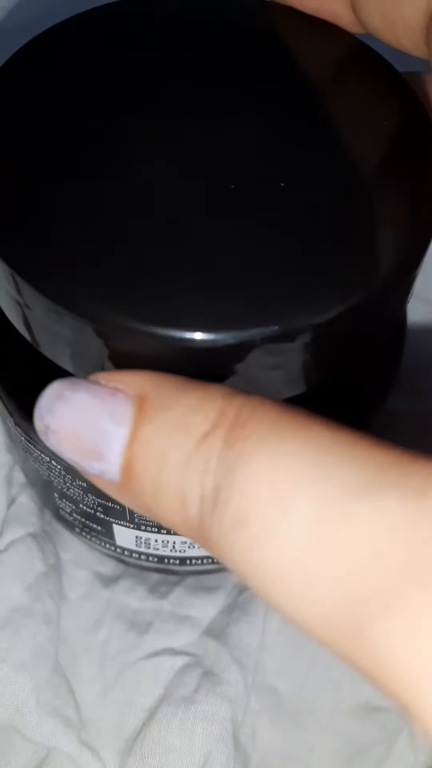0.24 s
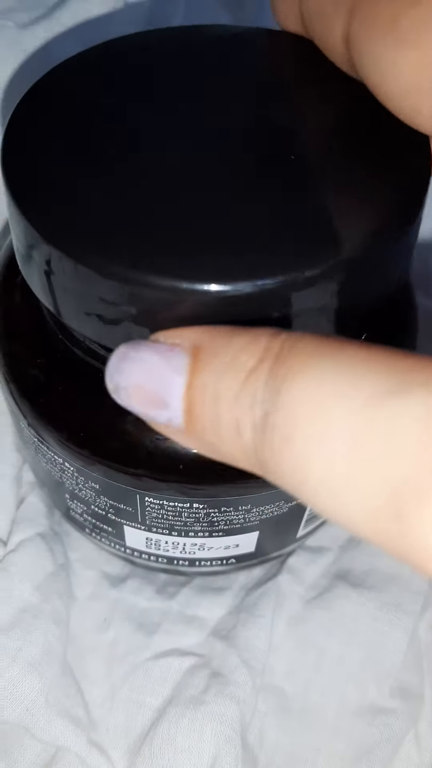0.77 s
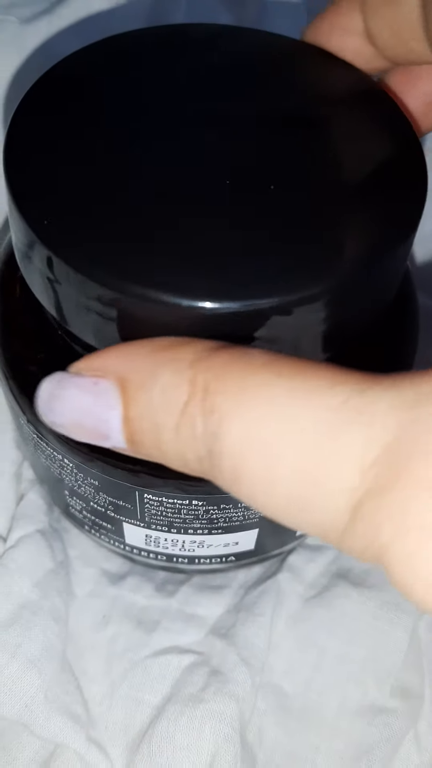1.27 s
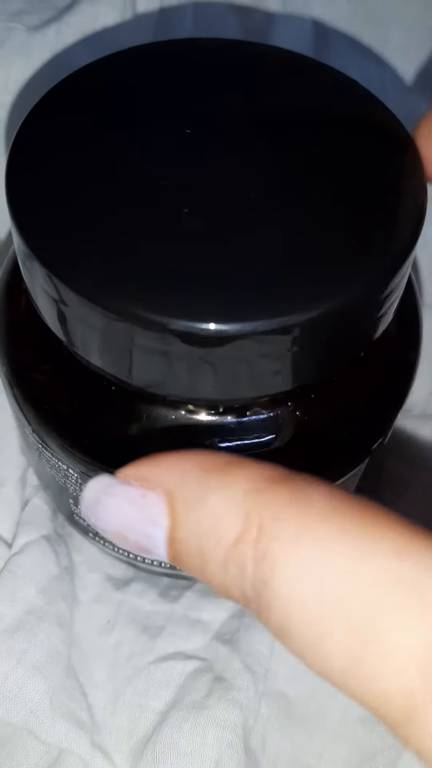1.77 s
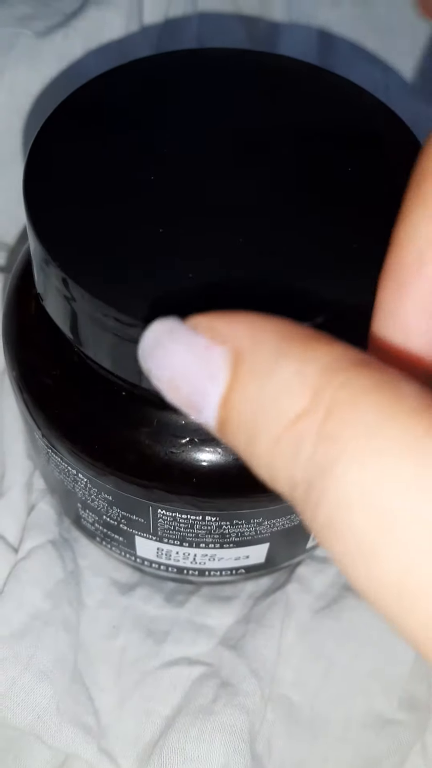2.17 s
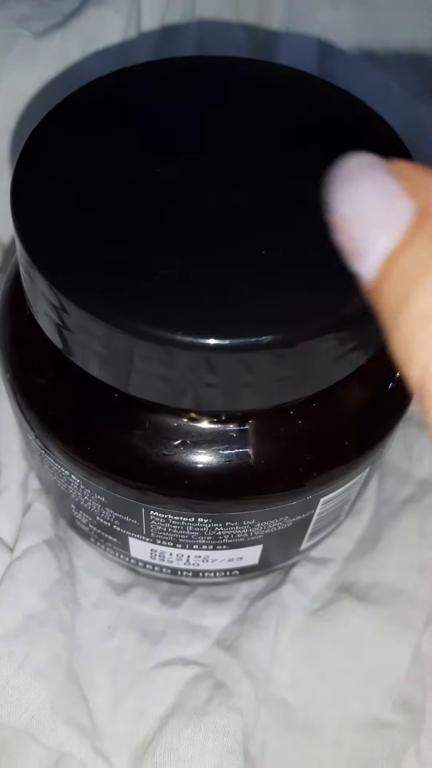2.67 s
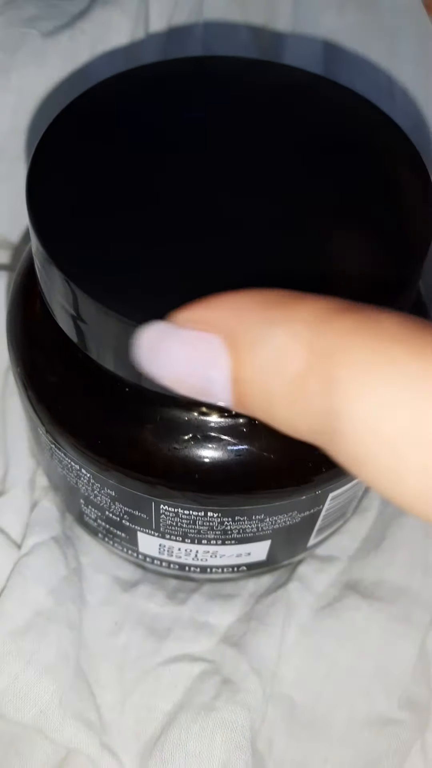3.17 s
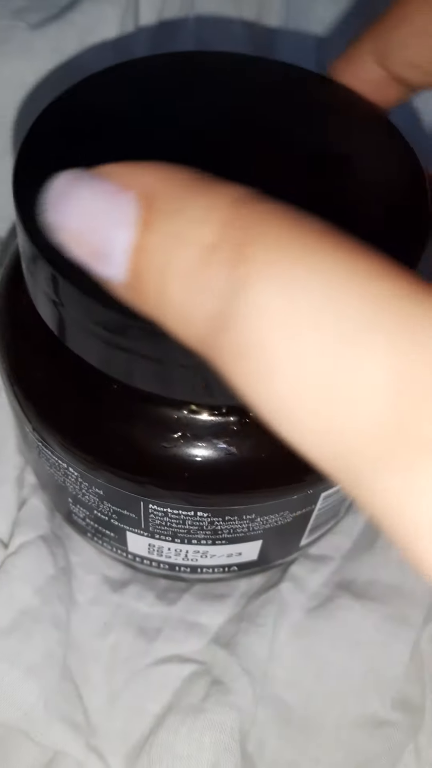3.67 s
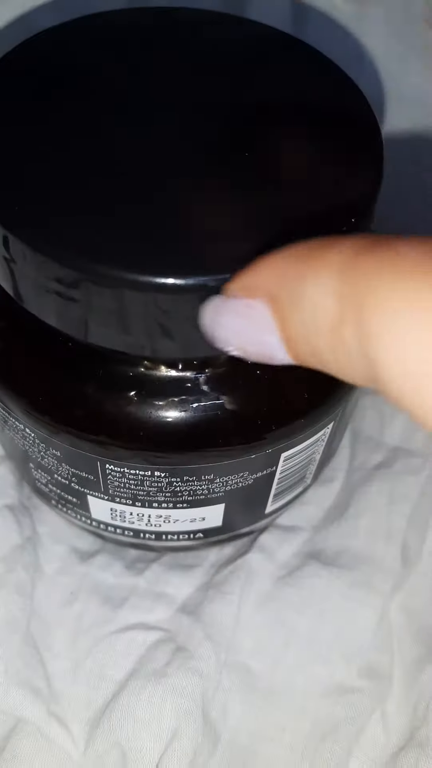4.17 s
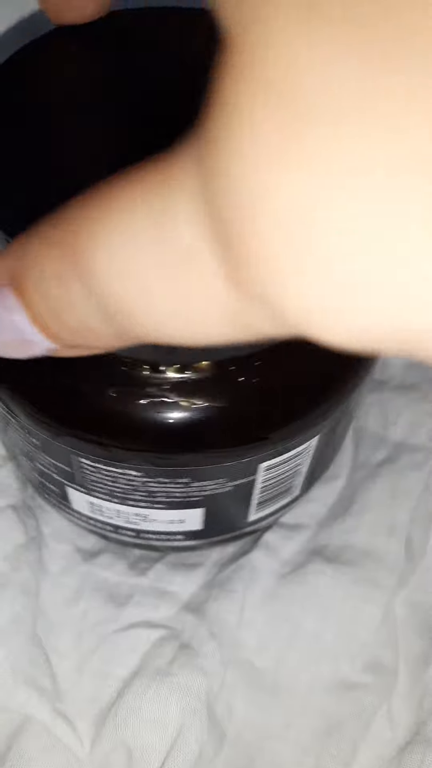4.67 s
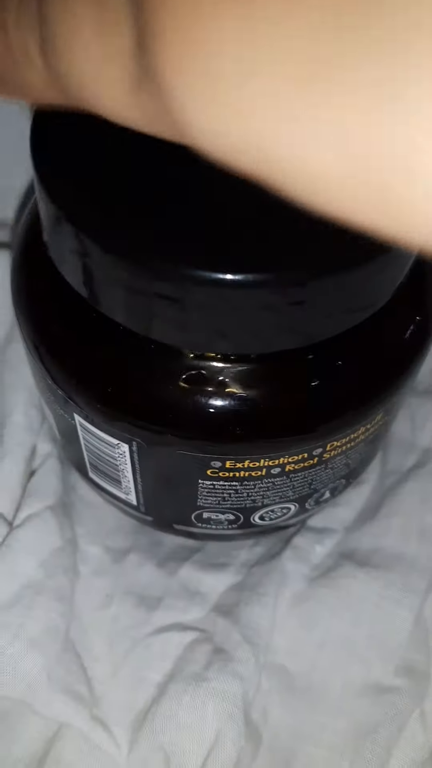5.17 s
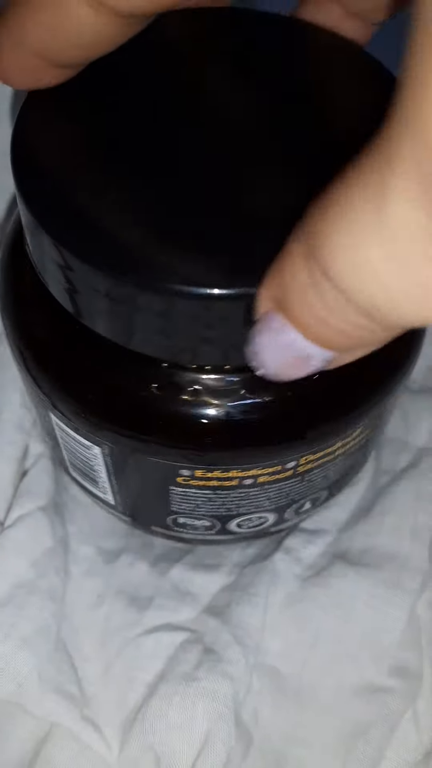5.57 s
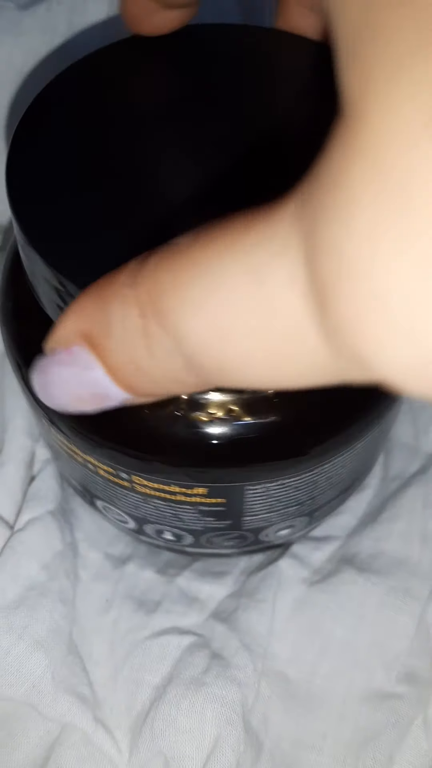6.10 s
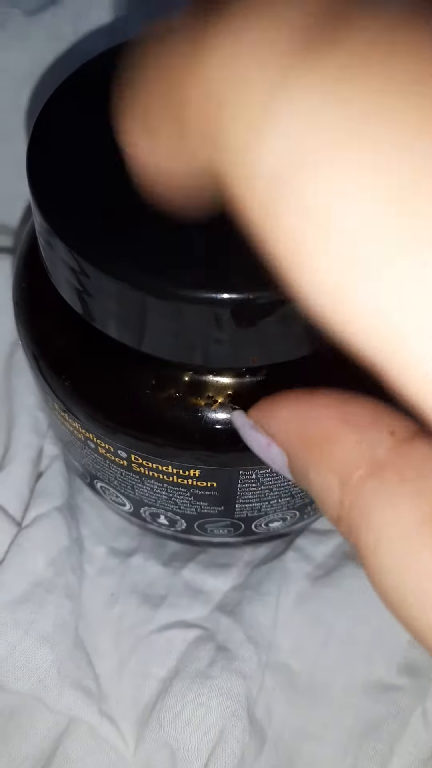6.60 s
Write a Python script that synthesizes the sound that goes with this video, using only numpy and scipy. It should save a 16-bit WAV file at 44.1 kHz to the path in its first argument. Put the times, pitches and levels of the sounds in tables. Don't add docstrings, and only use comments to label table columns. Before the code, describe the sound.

Close, dry crackling of fingers gripping and rubbing a plastic cap on a jar, easing mid-way, returning, then ending in sharp nail taps.

```python
import sys
import numpy as np
from scipy import signal
from scipy.fft import rfft, irfft, next_fast_len
from scipy.io import wavfile
from scipy.ndimage import uniform_filter1d

SR = 44100
rng = np.random.default_rng(int(sys.argv[2]) if len(sys.argv) > 2 else 0)


def field_ratio(decibels):
    return 10 ** (np.asarray(decibels, dtype=float) / 20)


def materialize(psi):
    bounded = np.clip(np.atleast_2d(psi).T, -1, 1)
    quanta = np.round(bounded * 32767).astype(np.int16)
    wavfile.write(sys.argv[1], SR, quanta)


N = 301768

# start in
# seconds, peak level in dB, ringing pitch in Hz, level of the bright spray in dB.
SKIN_SNAPS = [(0.0381, -33.5, 2970, -43), (0.0678, -16.5, 3570, -20.5), (0.0907, -22, 3600, -41),
              (0.1003, -13, 4140, -14), (0.1072, -14, 2330, -25), (0.1135, -11, 3320, -26),
              (0.1232, -16.5, 2260, -18.5), (0.1371, -24, 1700, -35), (0.1499, -14.5, 5900, -16.5),
              (0.1632, -33, 4780, -35), (0.1771, -14.5, 3230, -39), (0.185, -22, 4930, -20),
              (0.1979, -16, 1780, -13.5), (0.2088, -19.5, 3250, -26.5), (0.2626, -37, 4260, -33),
              (0.2818, -32, 4290, -38), (0.2875, -26, 6940, -26), (0.328, -25, 3600, -32),
              (0.3635, -22, 1720, -26), (0.3847, -26.5, 4060, -21.5), (0.4379, -32.5, 4720, -48),
              (0.4699, -11.5, 3360, -23.5), (0.4802, -19, 1660, -29.5), (0.4852, -27, 3120, -44),
              (0.5135, -21.5, 1830, -30.5), (0.5271, -22, 3190, -31.5), (0.5366, -19.5, 3300, -40),
              (0.5433, -23.5, 3640, -27.5), (0.5563, -32, 6680, -41.5), (0.5876, -30.5, 3600, -38.5),
              (0.5969, -19, 3510, -33.5), (0.6349, -32, 4820, -26.5), (0.6437, -16.5, 6650, -25),
              (0.6661, -18.5, 1130, -19.5), (0.6775, -16, 6010, -25), (0.6912, -19.5, 6040, -33.5),
              (0.7, -13.5, 3180, -18.5), (0.7042, -4.5, 4640, -18), (0.7324, -13, 6200, -23),
              (0.7427, -14.5, 4800, -25.5), (0.7723, -25.5, 1720, -36), (0.7861, -26, 3680, -35),
              (0.8012, -26.5, 4740, -29), (0.8351, -28, 5060, -41),
              (0.901, -29, 1850, -25), (0.933, -19, 3980, -34.5), (0.9424, -26, 1570, -39),
                    (0.954, -22, 5300, -21), (0.9645, -30, 4500, -28.5), (0.9758, -20, 3400, -23),
                    (0.9844, -27, 6270, -32), (0.9958, -16.5, 2970, -23.5), (1.0024, -14, 4690, -20.5),
                    (1.021, -11, 1660, -14.5), (1.0394, -22.5, 1660, -40), (1.0479, -19.5, 4070, -26),
                    (1.0554, -20, 6140, -25.5), (1.0785, -19, 1130, -30.5), (1.0937, -11, 4660, -20),
                    (1.1023, -15, 1760, -36), (1.111, -24, 6140, -25.5), (1.126, -25, 5990, -28.5),
                    (1.146, -30, 1940, -37), (1.18, -11.5, 5670, -24), (1.1945, -30, 6140, -37),
                    (1.233, -22, 4050, -27), (1.2546, -31, 5790, -26), (1.279, -25, 5920, -25),
                    (1.291, -28, 4840, -28.5), (1.3157, -29, 5340, -41), (1.331, -25, 5900, -36.5),
                    (1.3412, -18, 1910, -40.5), (1.366, -31, 1890, -46), (1.373, -17.5, 4820, -24),
                    (1.3875, -19.5, 3940, -38), (1.3985, -26, 4030, -45.5), (1.431, -21.5, 4090, -26.5),
              (1.4849, -14.5, 2930, -15.5), (1.4895, -37, 5190, -17.5), (1.4983, -25, 4010, -48),
                     (1.5148, -27, 1900, -39), (1.5336, -13, 3600, -22.5), (1.5654, -27, 3880, -49),
                     (1.584, -19, 6900, -25.5), (1.589, -24.5, 5990, -28), (1.608, -27.5, 1850, -31.5),
                     (1.6598, -19, 3930, -28.5), (1.677, -31, 6100, -30.5), (1.72, -28.5, 5620, -29),
                     (1.7511, -23, 5600, -22.5), (1.7552, -14.5, 1960, -18), (1.7885, -9.5, 2010, -18),
                     (1.797, -18.5, 6830, -28.5), (1.8162, -22, 5810, -17), (1.8453, -14.5, 4020, -19.5),
                     (1.871, -31, 2090, -43), (1.8834, -24.5, 6060, -30.5), (1.9147, -23, 2270, -35.5),
                     (1.9457, -26, 2000, -35), (1.9664, -13, 4020, -30), (2.0408, -14, 3330, -27),
                     (2.0492, -24, 2300, -43), (2.0553, -23, 3140, -41), (2.0898, -31, 3150, -50),
                     (2.1035, -20, 2940, -25), (2.1388, -26.5, 5230, -33.5),
              (2.245, -35, 4260, -58), (2.306, -31, 6340, -38.5), (2.3929, -21.5, 1980, -22),
                    (2.4103, -21, 6040, -31), (2.521, -32, 1830, -49), (2.528, -28.5, 5200, -48),
                    (2.5737, -25.5, 5880, -37), (2.6067, -19.5, 3120, -26.5), (2.63, -27.5, 4300, -39),
                    (2.7065, -25, 5800, -37), (2.735, -36, 5000, -37), (2.781, -37, 5000, -38),
                    (2.852, -36, 2280, -42), (2.9066, -30.5, 1900, -30.5), (2.9639, -34.5, 1960, -54),
                    (3.066, -25, 3970, -31), (3.1292, -14, 6240, -24), (3.1527, -11, 6300, -24),
                    (3.1769, -18.5, 2320, -22), (3.196, -26, 3900, -33), (3.239, -22.5, 4550, -25),
                    (3.26, -42, 6420, -25), (3.265, -23, 6900, -25.5), (3.414, -24, 2380, -40),
                    (3.453, -25.5, 5320, -38), (3.4707, -26, 2420, -37), (3.4767, -24, 6760, -28),
                    (3.4822, -26, 6980, -33), (3.5188, -33, 1360, -53), (3.647, -38, 5130, -61),
                    (3.6774, -28.5, 3030, -48), (3.7086, -27, 5020, -43), (3.727, -29, 4500, -42),
                    (3.7542, -18.5, 1650, -19), (3.8093, -35, 1960, -44), (3.867, -29, 4700, -34),
                    (3.8849, -31, 6400, -32), (3.919, -33, 2000, -50), (3.9245, -20, 2160, -21),
                    (3.963, -27.5, 2000, -47), (4.024, -32, 4780, -50), (4.0302, -25, 4630, -28.5),
                    (4.093, -30.5, 4310, -47), (4.1987, -23, 4370, -23.5),
              (4.2607, -26, 1880, -28.5), (4.308, -26, 4320, -26), (4.3314, -26.5, 1750, -32),
                   (4.3492, -19.5, 6700, -30.5), (4.4133, -33, 4460, -40), (4.432, -29, 5150, -23.5),
                   (4.4415, -27, 4270, -29.5), (4.5002, -27, 5060, -28.5), (4.5051, -16, 3700, -26.5),
                   (4.5531, -11, 3720, -21), (4.58, -22, 3490, -28.5), (4.635, -23, 5700, -19),
                   (4.6684, -47, 6460, -31.5), (4.69, -23.5, 3660, -23), (4.708, -25, 4410, -27.5),
                   (4.712, -12, 4900, -27.5), (4.719, -23, 3940, -23.5), (4.7246, -18.5, 1700, -23.5),
                   (4.7729, -21, 4390, -26.5), (4.8027, -19, 4460, -24), (4.837, -21, 4010, -34.5),
                   (4.8396, -20.5, 1270, -28), (4.846, -22.5, 4310, -30), (4.8535, -15, 3150, -17.5),
                   (4.907, -20.5, 5060, -39.5), (4.9379, -21, 4540, -31), (4.9419, -18.5, 2050, -28),
                   (4.964, -27, 5900, -24), (4.9862, -18, 1760, -26.5), (4.9973, -23, 4480, -35),
                   (5.0116, -13, 5430, -17), (5.0164, -21.5, 3790, -27.5), (5.0642, -24, 3320, -31),
              (5.1324, -18.5, 5300, -17), (5.1368, -15, 3900, -32), (5.2151, -22.5, 5000, -40),
                 (5.24, -24, 6370, -26), (5.2778, -14.5, 4600, -26), (5.315, -16, 4740, -26),
                 (5.3259, -17, 3980, -28), (5.347, -21.5, 2700, -20.5), (5.402, -27, 5090, -30),
                 (5.4063, -33, 5060, -32), (5.444, -30, 5360, -43), (5.4675, -24, 4500, -36),
                 (5.486, -25.5, 1820, -21), (5.5507, -27, 5960, -29), (5.5694, -17, 4600, -31),
                 (5.5854, -22.5, 6300, -25), (5.591, -29, 6780, -29), (5.6046, -27, 4970, -15),
                 (5.646, -29, 6350, -33), (5.6737, -23.5, 5670, -27), (5.685, -38, 4260, -39),
                 (5.697, -23, 5460, -37), (5.7089, -24, 4480, -28), (5.7274, -24.5, 5700, -33),
                 (5.734, -36, 4050, -36), (5.785, -30, 6440, -31.5), (5.8867, -25, 5340, -30),
                 (5.9621, -27.5, 5700, -32)]
LAST_TICKS = [
    (6.157, -53, 4020, -52),
    (6.192, -48, 4970, -50),
]
SNAP_DAMPING = 0.22
SPRAY_DB, WIDE_DB = 0.5, 1

# time in seconds, sheen in dB.
SHEEN = [(0, -1.5), (2.3, 3), (2.75, -3), (3.4, -3.5), (4.15, -5), (4.4, 0.5), (5.7, 5), (6.1, -0.5)]

# start in seconds, length in seconds, pressure in dB,
# share of rim scrape in dB, bite of the thread in dB.
STROKES = [(0, 5.95, -63.5, 4.5, 2), (0, 0.017, -46.5, 5.5, -8.5), (0.101, 0.1, -41, 6.5, -4.5),
           (0.471, 0.19, -47, 6.5, -2), (0.651, 0.099, -40.5, 3, -2.5), (0.881, 0.25, -47.5, 5.5, 1),
           (1.118, 0.27, -45.5, 3.5, -1), (1.356, 0.49, -51, 6.5, 2), (1.752, 0.092, -41, 4, -15),
           (1.833, 0.11, -50.5, 10, 11), (2.023, 0.063, -49.5, 5.5, -15), (2.403, 0.26, -57.5, 9, 10.5),
           (2.69, 0.13, -55, 6, -2), (3.131, 0.12, -51.5, 8, -4), (3.456, 0.046, -56, 0, -15),
           (3.694, 0.11, -55, 5.5, -1), (3.873, 0.076, -53, 8.5, 1.5), (4.265, 0.14, -47.5, 6.5, -7),
           (4.505, 0.3, -47, 6, 2), (4.835, 0.23, -41.5, -0.5, -0.5), (5.106, 0.25, -45.5, -0.5, -2.5),
           (5.506, 0.25, -53, -14, 1.5), (5.788, 0.15, -61.5, -15, -4), (5.948, 0.2, -71.5, -5, -2),
           (6.405, 0.02, -64.5, 2, 10)]
PRESS_DB_PER_S, LIFT_DB_PER_S, THREAD_LIFT_DB_PER_S = 232.5, 133, 300
SMOOTH_FROM_S = 5.99

PATCH_HZ = [2300, 3300, 4600, 6400, 8750]
SLIP_T60_S = 0.006

# frequency in Hz, level in dB.
FIZZ_TONE = [(880, -35), (1500, -11), (2690, -2), (4040, 3), (8160, -1), (12100, -4.5), (16000, -31)]
SCRAPE_TONE = [(1100, -15), (1600, 10.5), (2100, 4.5), (2700, -6), (4000, -29.5)]

# time in seconds, pitch in Hz.
RIM_PITCH = [(0, 1846), (2, 1890), (2.599, 2210), (3.9, 2003), (4.8, 1667), (5.4, 1892)]
RIM_REST_HZ = 1850

# start in seconds, peak level in dB, ringing pitch in Hz,
# time to die by 60 dB in seconds.
KNOCKS = [(0.016, -11.5, 1220, 0.011), (0.642, -20, 1080, 0.02), (0.665, -5, 908, 0.021),
          (0.719, -13, 855, 0.022), (0.766, -27, 724, 0.029), (1.016, -36, 1090, 0.025),
          (1.077, -10.5, 293, 0.009), (1.29, -30, 353, 0.022), (1.313, -26, 386, 0.018),
          (1.395, -23.5, 440, 0.032), (2.265, -24.5, 397, 0.01), (2.341, -21, 458, 0.017),
          (3.415, -26.5, 310, 0.023), (3.489, -17.5, 460, 0.014), (3.518, -11, 355, 0.0082),
          (3.833, -36, 400, 0.045), (5.887, -19.5, 960, 0.0058), (2.851, -38, 168, 0.089),
          (6.2, -43, 85, 0.071), (6.262, -43, 118.6, 0.056)]

# frequency in Hz, level in dB.
THREAD_TONE = [(540, -13.5), (900, -2.5), (1200, 1), (1450, -5), (2000, -27)]
NECK_HUM_DB = -65

# start in seconds, peak level in dB, level of the thud in dB.
TAPS = [
    (6.372, -11, -26),
    (6.505, 3.5, -21),
    (6.606, -3, -23.5),
    (6.641, -5, -24),
    (6.69, -1.5, -20),
    (6.761, -3.5, -24),
    (6.785, -5, -28),
    (6.833, -1.5, -18),
]

# pitch in Hz, width in Hz, level in dB.
LID_INDEX = [(1366, 234, 2), (1860, 130, -8), (2210, 160, -6), (3600, 1100, -12), (5430, 540, -14.5),
             (6700, 930, -6), (8050, 570, -4), (8700, 150, -24), (9400, 560, -9.5), (11600, 520, -8),
             (12200, 630, -27)]
LID_MIDDLE = [(1310, 147, 0), (2310, 510, -4), (3700, 260, -17), (4690, 370, -18), (6470, 1100, -7),
              (7440, 270, -17), (8460, 280, -24), (9190, 260, -18), (9500, 370, -18), (10650, 380, -17)]
LID_RING = [(1270, 970, -8), (3160, 380, -3.5), (4260, 210, -25), (5090, 290, -20), (6700, 380, -8.5),
            (7460, 230, -12), (8180, 520, -11), (8750, 170, -25), (9200, 350, -20), (10400, 450, -17)]
LID_FLAT = [(1246, 310, 0), (2250, 210, -6), (2980, 600, -8.5), (5300, 560, -16.5), (6770, 580, -14),
            (7470, 680, -8), (8200, 340, -10), (9240, 460, -12), (10500, 210, -32), (11950, 550, -14)]
FINGERS = [LID_INDEX, LID_FLAT, LID_MIDDLE, LID_RING, LID_INDEX, LID_MIDDLE, LID_RING, LID_INDEX]

# start in seconds, length in seconds, force in dB.
SHOVES = [(0, 0.018, -51), (0.672, 0.075, -34), (.8, 0.095, -47.5), (1.044, 0.033, -42), (1.248, 0.38, -47),
          (1.748, 0.23, -35.5), (2.306, .32, -46.5), (2.825, 0.12, -43), (3.056, 0.15, -44.5),
          (3.495, 0.2, -44), (3.829, 0.12, -44), (5.522, 0.069, -57)]
PUSH_DB_PER_S, SETTLE_DB_PER_S, REST_DB = 291, 187, -66.5

# frequency in Hz, level in dB.
DRAG_TONE = [(120, 1.5), (220, 8), (420, 4.5), (560, 0), (1100, -37.5)]
RUMBLE_TONE = [(15, -40), (30, -10.5), (46, 3.5), (68, -4.5), (102, 2), (124, -6), (188, -11.5),
               (300, -26.5), (390, -36.5), (660, -120)]

# time in seconds, level in dB.
HAND_WEIGHT = [(0, -52.5), (.5, -54.5), (1.2, -57.5), (2.05, -51), (2.3, -70), (2.7, -61), (3.3, -54.5),
               (3.9, -63.5), (4.27, -70), (4.55, -53.5), (5.65, -56), (6.0, -63.5), (6.84, -54)]
RUMBLE_FOLLOW_DB, SWAY_DB, SWAY_S = -9, 3, 0.1

# frequency in Hz, time to die by 60 dB in seconds.
ROOM_DECAY = [(300, 0.44), (1500, 0.27), (6000, 0.27), (14000, 0.22)]

# frequency in Hz, level in dB.
HUSH_TONE = [(120, -20), (200, -15), (440, -22.5), (560, -4), (806, -15), (1320, -12), (2560, -30.5),
             (16000, -53.5)]
HUSH_DB = -71.5
HUM_HZ, HUM_WIDTH_HZ, HUM_DB = 154.4, 8.8, -61.5

TOP_HZ, EDGE_HZ, TOP_GATE_DB = 15950, 16650, -66


def snaps():
    out, t = np.zeros(N), np.arange(500) / SR
    band, top, glare = (signal.butter(3, edges, "band", output="sos", fs=SR)
                        for edges in ([1150, 7200], [6500, 10500], [10000, 13500]))
    sheen = field_ratio(along(SHEEN) - 5.0)
    attack = 1 - np.exp(-t / 0.00012)
    shape = attack * (field_ratio(-60 * t / 0.0034) + field_ratio(-20 - 60 * t / 0.016))
    rows = (SKIN_SNAPS + LAST_TICKS)
    for (s, db, hz, spray_db), noise in zip(rows, rng.standard_normal((len(rows), 3, 500))):
        tear = noise * shape
        cap = peaked(ring(tear[0], hz, SNAP_DAMPING * hz))
        rip = field_ratio(WIDE_DB) * peaked(ring(tear[1], 1500 + hz, 5300))
        body = field_ratio(db) * peaked(signal.sosfilt(band, cap + rip))
        bright = peaked(signal.sosfilt(top, tear[2]))
        bright += sheen[round(s * SR)] * peaked(signal.sosfilt(glare, tear[2]))
        add(out, s - 0.0003, body + field_ratio(spray_db + SPRAY_DB) * bright)
    return out


def skin_rub():
    rim_db = np.array(STROKES)[:, 3]
    skin, low_slips = crackle_of_skin()
    skin = np.where(np.arange(N) < SMOOTH_FROM_S * SR, evened(skin), rng.standard_normal(N))
    fizz = field_ratio(stroke() + 1.0) * colour(skin, FIZZ_TONE)
    rough = low_slips + 1.1 * rng.standard_normal(N)
    scrape = field_ratio(stroke(rim_db) - 5.5) * colour(rough, SCRAPE_TONE)
    return fizz + shifted(scrape, along(RIM_PITCH) - RIM_REST_HZ)


def crackle_of_skin():
    patches = [evened(ring(grit(160, 5.9, 0.37, SLIP_T60_S), hz, 0.5 * hz)) for hz in PATCH_HZ]
    wide = grit(260, 8.7, 0.12, SLIP_T60_S)
    broad = 2.03 * evened(ring(wide, 5000, 6500))
    fine = field_ratio(along(SHEEN) + 4.5) * evened(ring(wide, 12000, 5000))
    return sum(patches) + broad + fine, patches[0]


def knocks():
    out, t = np.zeros(N), np.arange(4000) / SR
    swell = 1 - np.exp(-t / 0.0021)
    for s, db, hz, t60 in KNOCKS:
        tone = np.sin(2 * np.pi * hz * t)
        if 200 < hz < 600:
            tone += field_ratio(-5.5 - 60 * t / 0.031) * np.sin(2 * np.pi * (hz + 750) * t)
        add(out, s, field_ratio(db + 2.5 - 60 * t / t60) * swell * tone)
    return out


def thread_rub():
    bite_db = np.array(STROKES)[:, 4]
    level = np.hypot(field_ratio(stroke(bite_db, THREAD_LIFT_DB_PER_S)), field_ratio(NECK_HUM_DB))
    return level * field_ratio(-7.0) * colour(grit(220, 1.3, 1.0, 0.0089), THREAD_TONE)


def taps():
    out, t = np.zeros(N), np.arange(2000) / SR
    sink = np.sin(np.pi * np.minimum(t / 0.0115, 1)) ** 2
    thud = -np.sin(2 * np.pi * 115 * t) * sink
    thud += field_ratio(-18.0 - 60 * t / 0.084) * np.sin(2 * np.pi * 490 * t)
    contact = 1 - np.exp(-t / 0.00015)
    for (s, db, thud_db), modes, noise in zip(TAPS, FINGERS, rng.standard_normal((len(TAPS), 2000))):
        blow = (t < 0.00004) + 0.07 * noise * field_ratio(-60 * t / 0.01)
        lid = np.zeros(len(t))
        for hz, width, mode_db in modes:
            sign = -1 if 2600 < hz < 4000 else 1
            lid += sign * field_ratio(mode_db) * width * ring(blow, hz, width)
        add(out, s + 0.00085, field_ratio(db - 5.5) * (peaked(contact * lid) + field_ratio(thud_db) * thud))
    return out


def far_taps():
    out, click = np.zeros(N), np.arange(400) == 0
    hump = peaked(np.gradient(ring(click, 1380, 500)))
    for s, db, _ in TAPS:
        add(out, s, field_ratio(db - 13.0) * (hump + field_ratio(14.0) * click))
    return out


def shove_force():
    return field_ratio(gesture(SHOVES, np.array(SHOVES)[:, 2], PUSH_DB_PER_S, SETTLE_DB_PER_S, REST_DB))


def cloth_drag(shove):
    return shove * field_ratio(-5.0) * colour(grit(40, 4.4, 1.8, 0.036), DRAG_TONE)


def bedding_rumble(shove):
    span = round(SWAY_S * SR)
    sway = uniform_filter1d(rng.standard_normal(N), span)
    sway = evened(uniform_filter1d(sway, span))
    weight = field_ratio(along(HAND_WEIGHT) + 1.0 + SWAY_DB * sway)
    level = np.hypot(weight, field_ratio(RUMBLE_FOLLOW_DB) * shove)
    return level * colour(rng.standard_normal(N), RUMBLE_TONE)


def room(x):
    noise = rng.standard_normal(SR // 2)
    hz, t, z = signal.stft(noise, SR, nperseg=256)
    f, t60 = np.transpose(ROOM_DECAY)
    z *= field_ratio(-60 * t / np.interp(np.log(hz + 1), np.log(f), t60)[:, None])
    tail = signal.istft(z, SR, nperseg=256)[1]
    tail = np.append(np.zeros(round(0.0115 * SR)), tail / np.linalg.norm(tail))
    return signal.fftconvolve(x, tail)[:N]


def room_hush():
    hush = field_ratio(HUSH_DB) * colour(rng.standard_normal(N), HUSH_TONE)
    drone = evened(ring(rng.standard_normal(N), HUM_HZ, HUM_WIDTH_HZ))
    return hush + field_ratio(HUM_DB) * drone


def grit(per_s, spread_db, smooth, t60):
    sizes = field_ratio(spread_db * np.minimum(rng.exponential(1, N), 2.6))
    slips = sizes * (rng.random(N) < per_s / SR)
    puffs = signal.lfilter([1], [1, -10 ** (-3 / (t60 * SR))], slips)
    return (smooth + evened(puffs)) * rng.standard_normal(N)


def gesture(rows, levels_db, rise, fall, rest_db=-90):
    t = np.arange(0, N + 64, 64) / SR
    start, length = np.transpose(rows)[:2, :, None]
    before = rise * np.maximum(start - t, 0)
    after = fall * np.maximum(t - start - length, 0)
    db = np.array(levels_db)[:, None] - before - after
    return np.interp(np.arange(N) / SR, t, np.maximum(db.max(axis=0), rest_db))


def stroke(share_db=0, lift=LIFT_DB_PER_S):
    return gesture(STROKES, np.array(STROKES)[:, 2] + share_db, PRESS_DB_PER_S, lift)


def along(curve):
    return np.interp(np.arange(N) / SR, *np.transpose(curve))


def ring(x, hz, width):
    pole = np.exp((2j * np.pi * hz - np.pi * width) / SR)
    return signal.lfilter([1], [1, -pole], x).imag


def colour(x, points):
    f, db = np.transpose(points)
    size = next_fast_len(len(x))
    hz = np.fft.rfftfreq(size, 1 / SR)
    gain = field_ratio(np.interp(np.log(hz + 1), np.log(f + 1), db))
    return evened(irfft(rfft(x, size) * gain, size)[:len(x)])


def shifted(x, hz):
    turning = np.exp(2j * np.pi * np.cumsum(hz) / SR)
    return (signal.hilbert(x, next_fast_len(N))[:N] * turning).real


def evened(x):
    return x / np.sqrt(np.mean(x ** 2) + 1e-20)


def peaked(x):
    return x / abs(x).max()


def add(mix, s, sound):
    part = mix[max(round(s * SR), 0):][:len(sound)]
    part += sound[:len(part)]


def scene():
    crackle = snaps() + knocks()
    shove = shove_force()
    rubbing = skin_rub() + thread_rub() + cloth_drag(shove) + bedding_rumble(shove)
    echoes = signal.lfilter(*signal.butter(1, 4000, fs=SR), room(crackle + far_taps()))
    mono = crackle + taps() + rubbing + field_ratio(-16.0) * echoes + room_hush()
    return np.array([mono, mono])


def band_limit(x):
    return signal.sosfilt(signal.butter(12, 16990, fs=SR, output="sos"), x)


def record(dry):
    cut = signal.sosfilt(signal.butter(8, 41, "high", output="sos", fs=SR), dry)
    side = field_ratio(-40) * np.roll(cut[0], 90)
    stereo = cut + [side, -side]
    low, full = (signal.oaconvolve(stereo, signal.firwin(255, hz, window=("kaiser", 9), fs=SR)[None], "same")
                 for hz in (TOP_HZ, EDGE_HZ))
    top = full - low
    gate = uniform_filter1d(top[0] ** 2, size=300) > field_ratio(TOP_GATE_DB) ** 2
    opening = uniform_filter1d(gate * 1.0, size=200)
    return band_limit(low + 0.5 * top * opening)


dry = scene()
out = record(dry)
materialize(out)
```